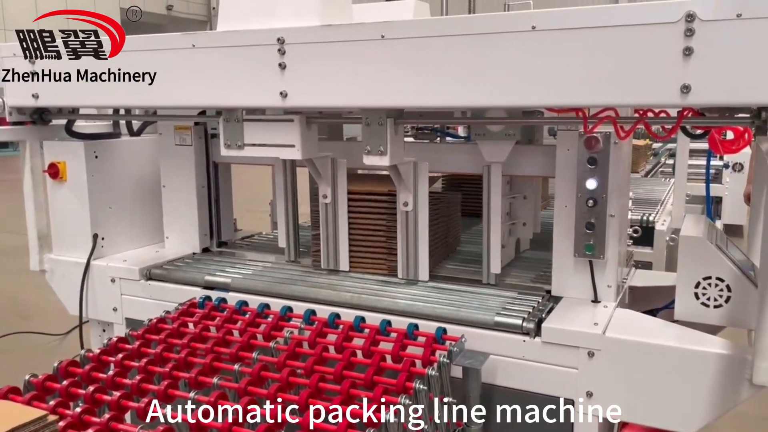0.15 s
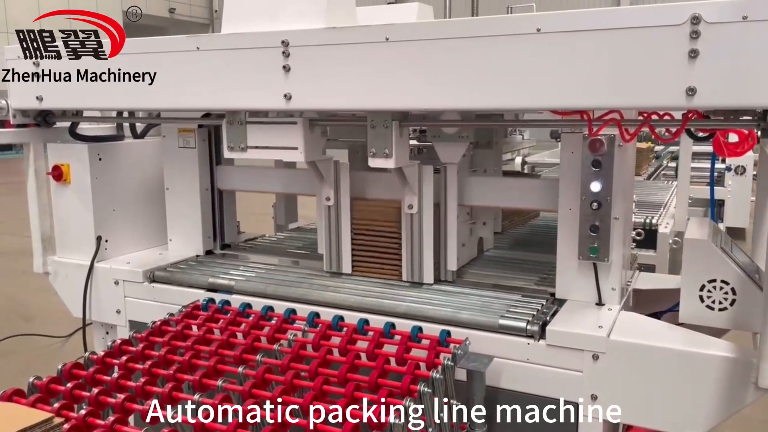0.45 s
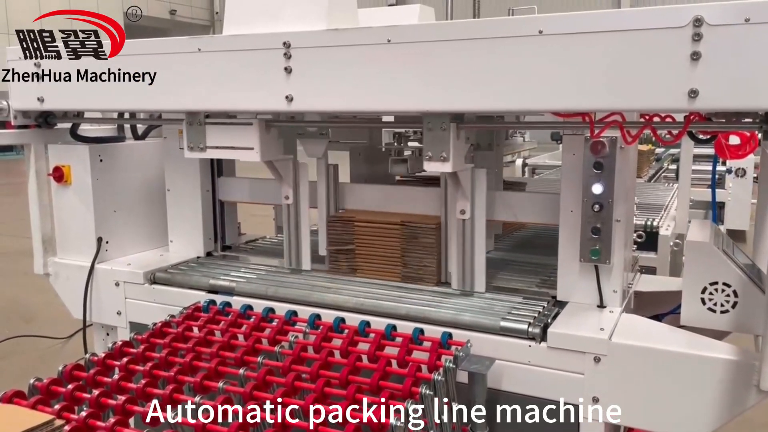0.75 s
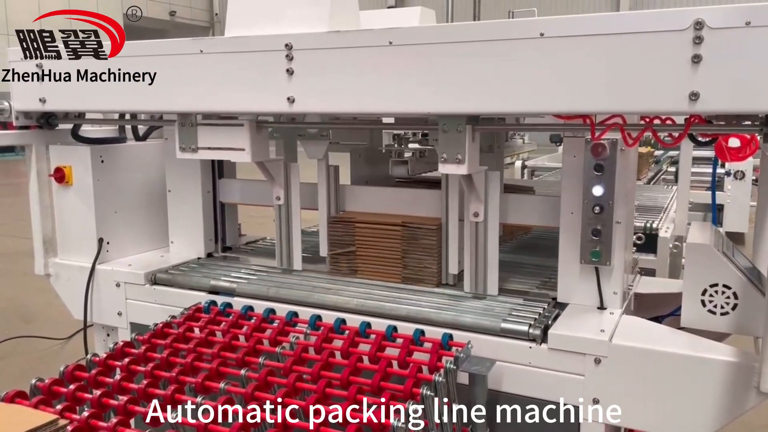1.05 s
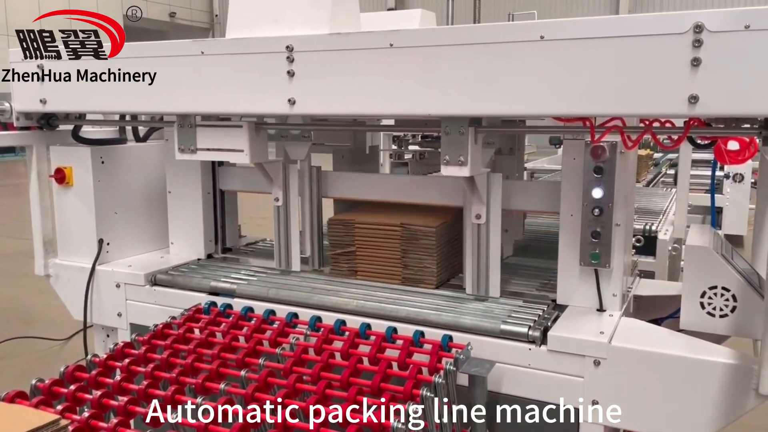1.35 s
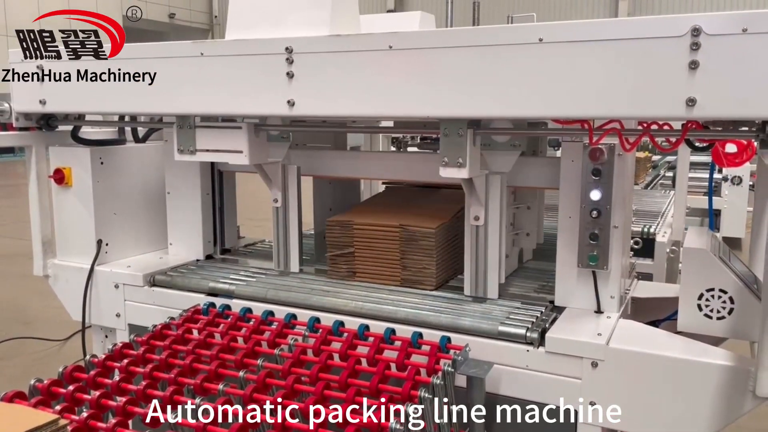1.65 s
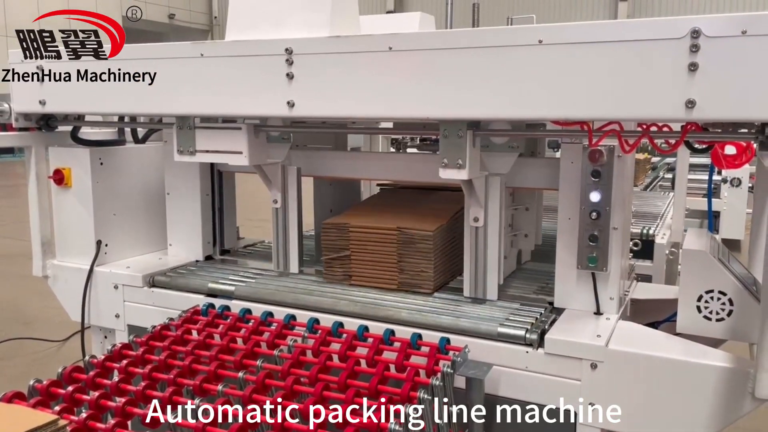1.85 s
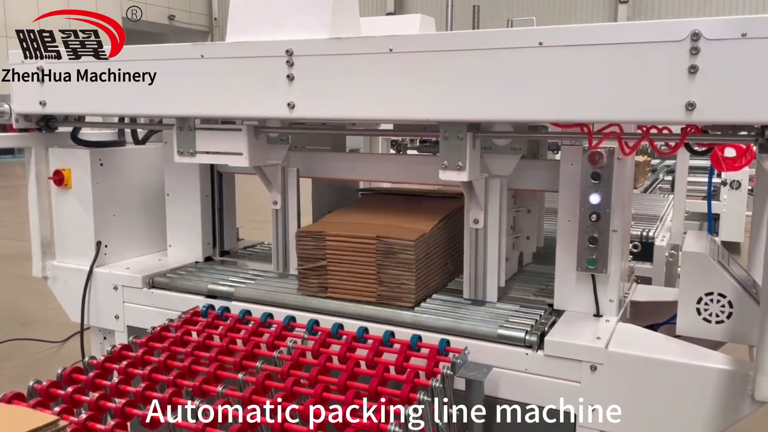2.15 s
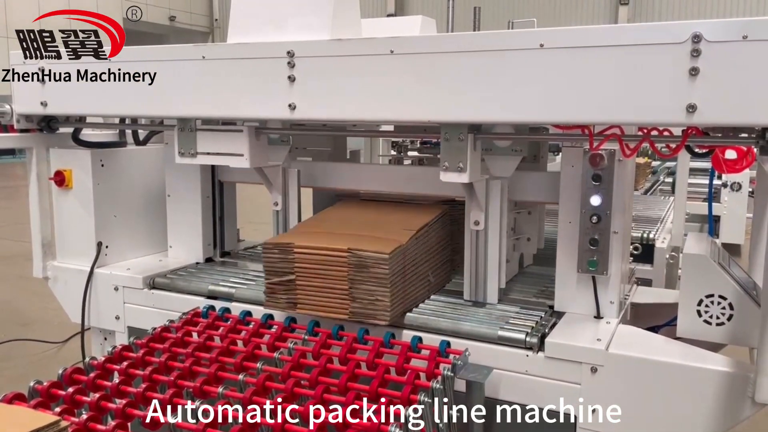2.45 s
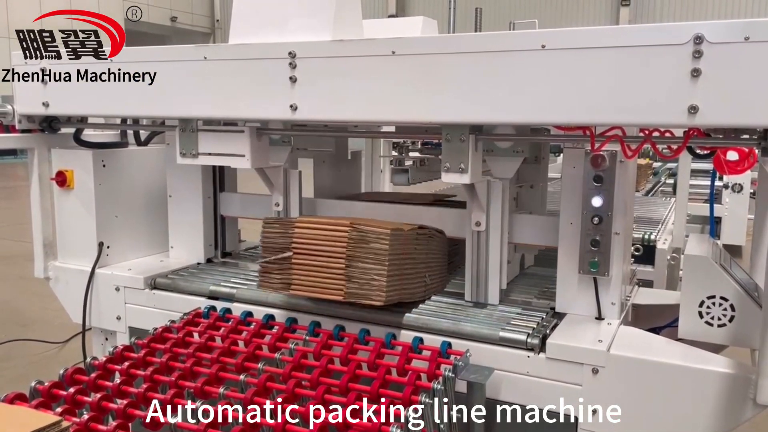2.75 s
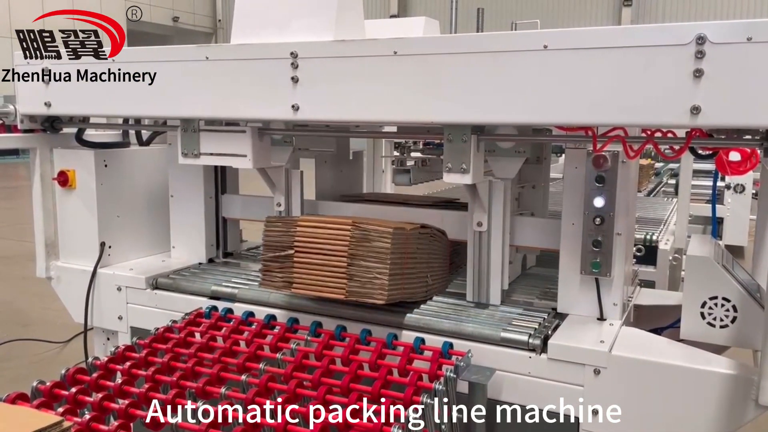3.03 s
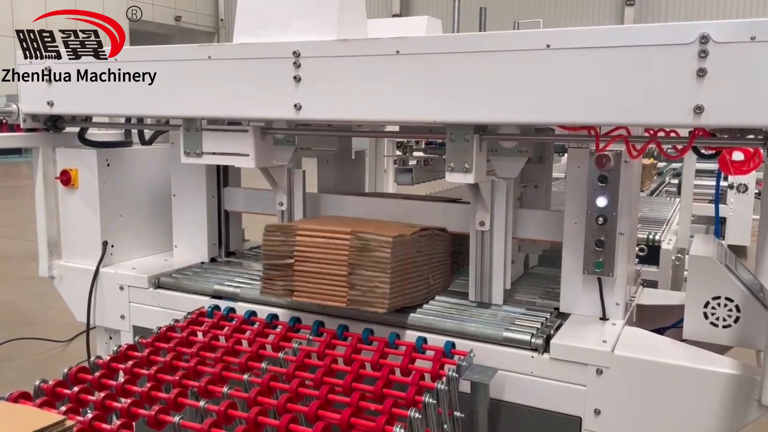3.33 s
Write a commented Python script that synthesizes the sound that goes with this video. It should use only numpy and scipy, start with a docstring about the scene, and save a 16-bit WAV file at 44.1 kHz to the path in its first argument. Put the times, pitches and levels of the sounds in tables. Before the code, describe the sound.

A packing machine handles a carton stack: rattle and air hiss, then irregular steel clacks, rising air-cylinder whistles, a low motor hum and late dull knocks, in a factory hall, heard fairly close on a stereo phone.

```python
"""A low rumble, a frame rattle and air hiss are heard first, over the smooth noise of a factory hall.
This is a packing line: steel arms soon clack against their stops, made from noise bursts and ringing modes.
Air cylinders whistle upward as they stroke: rising tones made breathy by slow noise.
A motor hum of two sine waves joins in, and late dull knocks are short low tones with a rustle."""
import sys
import numpy as np
from scipy import signal
from scipy.fft import rfft, irfft, next_fast_len
from scipy.io import wavfile
from scipy.ndimage import uniform_filter1d

SR = 44100
rng = np.random.default_rng(int(sys.argv[2]) if len(sys.argv) > 2 else 0)


def materialize(psi):
    """Save the field psi as 16-bit PCM at rate SR to the path in sys.argv[1].

    A 1-D psi becomes a single channel; in a 2-D psi each row is a channel.
    """
    bounded = np.clip(np.atleast_2d(psi).T, -1, 1)
    quanta = np.round(bounded * 32767).astype(np.int16)
    wavfile.write(sys.argv[1], SR, quanta)


def attenuation_scalar(level_db):
    """Turn a level in dB into a linear amplitude multiplier (20 dB per decade)."""
    decades = np.asarray(level_db, float) / 20
    return 10 ** decades


N = 153909
T = np.arange(N) / SR  # time of each sample [s]
SIZE = next_fast_len(N + SR // 2)  # spectrum size with room for the echo tail
HZ = np.arange(SIZE // 2 + 1) * SR / SIZE + 1e-3  # kept above 0 so that its logarithm exists

# moving line: (time [s], frame rattle level [dB], rasp level [dB], base air hiss level [dB],
# base top hiss level [dB])
LINE_LEVELS = [(0, -35.5, -57, -37, -55), (.39, -37, -39, -35.5, -48), (.46, -18, -24.5, -33, -44),
               (.62, -28.5, -34, -36, -54), (.8, -21.5, -26.5, -32.5, -43), (.93, -31, -36.5, -46, -53.5),
               (1.03, -25, -27, -31.5, -57), (1.22, -27.5, -33.5, -34.5, -55), (1.5, -31, -33.5, -35, -50),
               (1.72, -28.5, -34, -39.5, -59), (1.88, -47, -37, -37.5, -48.5),
               (1.95, -23.5, -31, -36.5, -45), (2.045, -32.5, -38, -30, -41.5),
               (2.13, -25.5, -32.5, -33.5, -35), (2.28, -38.5, -47.5, -43.5, -57),
               (2.6, -32, -35, -35, -44.5), (3.0, -43.5, -40.5, -39, -53.5), (3.49, -37.5, -38, -49, -49.5)]
# resonances of the frame: (frequency [Hz])
FRAME_MODES = [189.5, 239.8, 292, 335.7, 372.6, 421, 525]
# deep rumble: (time [s], base level [dB])
RUMBLE_LEVELS = [(0, -35.5), (1.25, -30), (1.8, -40), (3.49, -41.5)]
# modes of the steel arms: (frequency [Hz])
STEEL_MODES = [857, 1142, 1375, 1775, 2147, 2490, 2730, 3082, 3793, 4227, 4695, 5262]
# colour of the hall noise: (frequency [Hz], relative level [dB])
HALL_COLOUR = [(60, -2.5), (1000, -14), (12000, -40)]
# arms hitting steel stops: (time [s], peak level of the main sound [dB], favoured pitch [Hz],
# treble peak relative to the main sound [dB])
CLACK_HITS = [(0.115, -17.5, 1775, -35), (0.3618, -19, 3470, 2.5), (0.4286, -15, 1710, -25),
              (.451, -9.5, 1190, -13.5), (.478, -17.5, 1200, -25), (0.6479, -13, 1640, -22),
              (0.6967, -16.5, 4570, -14), (0.8202, -8, 4750, -8), (0.8285, -4, 4000, -1),
              (1.2865, -20, 4000, -8), (1.456, -13.5, 3130, -19), (1.547, -9.5, 1900, 1.5),
              (1.581, -10.5, 2500, -7), (1.714, -22, 1500, -27), (2.157, -13, 4700, 7),
              (2.4324, -15, 4340, -29), (2.635, -17, 4230, -8), (2.7795, -13.5, 4530, -15),
              (2.895, -9, 4640, -13), (2.92, -15, 2560, 2), (3.0667, -23, 2510, -30)]
# air strokes: (start [s], length [s], pitch approached at the end [Hz], base whistle level [dB])
AIR_STROKES = [(0.541, 0.39, 4130, -41.5), (1.758, 0.29, 3925, -43), (2.618, 0.36, 3796, -40.5)]
# whistle tones: (multiple of the pitch [1], relative level [dB], level change once risen [dB per s])
WHISTLE_TONES = [(1, 3, -32), (2, -1, -3), (3, -10, 3)]
# motor hum: (time [s], base level [dB])
HUM_LEVELS = [(.86, -25.5), (1.0, -36), (1.03, -24.5), (1.2, -20.5), (1.5, -43), (1.8, -36.5), (2.1, -42)]
# hum tones: (multiple of the hum pitch [1], relative level [dB])
HUM_TONES = [(1, 2), (4, -13.5)]
# dull knocks of carton and frame: (time [s], level [dB], pitch [Hz])
KNOCKS = [(2.503, -15.5, 532), (3.073, -18.5, 462), (3.275, -24, 189)]
# two microphone ports: (frequency [Hz], phase lead of left over right [rad], echo level [dB])
PORT_RESPONSE = [(60, 0, -7), (130, 0, -19), (500, 0, -7), (5000, .3, -3), (7900, -2.85, -20),
                 (10200, -3.25, -20), (11800, -5.9, -13)]


def unit(x):
    """Scale to rms 1."""
    return x / np.sqrt(np.mean(x ** 2))


def curve(table, column):
    """Join the points of a table column with straight lines over time."""
    points = np.array(table)
    return np.interp(T, points[:, 0], points[:, column])


def log_curve(table, column, left=None):
    """Join the points of a table column over the logarithm of frequency."""
    points = np.array(table)
    return np.interp(np.log(HZ), np.log(points[:, 0]), points[:, column], left=left)


def band(x, low_hz, high_hz):
    """Keep the frequencies between two limits."""
    edges = [low_hz, min(high_hz, 0.45 * SR)]
    return signal.sosfilt(signal.butter(2, edges, "band", fs=SR, output="sos"), x)


def walk(rate):
    """A smooth random curve with about `rate` new values per second and a spread near 1."""
    hold = int(SR / rate)
    steps = np.repeat(rng.standard_normal(N // hold + 1), hold)
    return 1.3 * uniform_filter1d(uniform_filter1d(steps, hold), hold)[:N]


def decay(t60, t):
    """An exponential fade that loses 60 dB in t60 seconds."""
    return np.exp(-np.log(1000) * t / t60)


def ring(hz, t60, t):
    """One mode of a struck body: a sine wave that dies away."""
    return np.sin(2 * np.pi * hz * t) * decay(t60, t)


def add(out, at, x):
    """Mix a short sound in at a time in seconds."""
    start = int(at * SR)
    out[start:start + len(x)] += x[:N - start]


def hiss(low_hz, high_hz, db):
    """Noise in one band whose level flickers at random around db."""
    noise = unit(band(rng.standard_normal(N), low_hz, high_hz))
    return attenuation_scalar(db + 3.72 * walk(15)) * noise


def whirr(modes):
    """Loose parts shake the arms: each mode flares up and dies on its own."""
    total = np.zeros(N)
    for hz in modes:
        shaken = unit(band(rng.standard_normal(N), hz * 0.97, hz / 0.97))
        total += attenuation_scalar(4 * walk(18)) * shaken
    return unit(total)


def frame():
    """Rollers tap the frame's resonances at random and rasp on the guides; a deep rumble lies under them."""
    taps_per_s, spread_db, width = 1200, 1.5, 0.15  # width is a share of each resonance's frequency
    happens = rng.random(N) < taps_per_s / SR
    taps = rng.standard_normal(N) * happens * attenuation_scalar(spread_db * rng.exponential(size=N))
    rattle = np.zeros(N)
    for k, hz in enumerate(FRAME_MODES):
        mode = unit(band(taps, hz * (1 - width / 2), hz * (1 + width / 2)))
        rattle += (-1) ** k * attenuation_scalar(3.1 * walk(12)) * mode  # neighbours swing in opposite directions
    rasp = unit(band(taps, 633, 1370)) + hiss(560, 3270, -2.5) + 0.67 * whirr(STEEL_MODES[:5])
    rumble = hiss(25, 149, curve(RUMBLE_LEVELS, 1))
    rattle = unit(rattle) * attenuation_scalar(curve(LINE_LEVELS, 1))
    rasp = unit(rasp) * attenuation_scalar(curve(LINE_LEVELS, 2))
    return rattle + rasp + rumble


def air_hiss():
    """Air rushes as flickering bands of noise, mixed with the whirr of the higher steel modes."""
    middle = hiss(2420, 4460, -7.5) + hiss(7950, 9740, -5) + 0.54 * whirr(STEEL_MODES[5:])
    top = hiss(7000, 10500, -3) + hiss(10800, 13500, -1)
    return middle * attenuation_scalar(curve(LINE_LEVELS, 3)) + top * attenuation_scalar(curve(LINE_LEVELS, 4))


def hall():
    """Distant machines merge into a smooth noise whose level drifts slowly."""
    colour = attenuation_scalar(log_curve(HALL_COLOUR, 1, left=-40))
    noise = irfft(rfft(rng.standard_normal(SIZE)) * colour)[:N]
    return unit(noise) * attenuation_scalar(-37 + 2.57 * walk(2.736))


def clacks():
    """Each stop chatters for a moment: a crack of noise that rings the modes nearest its own pitch most."""
    chatter_t60_s, tail_s = 0.055, 0.032
    ring_cycles = 110  # cycles in which a mode loses 60 dB
    scatter_db, slope_db = 4, -9.8  # random spread of the modes; loss per octave from the pitch
    out, t, modes = np.zeros(N), T[:SR // 4], np.array(STEEL_MODES)
    shape = np.minimum(t / 0.002, 1) * (decay(chatter_t60_s, t) + 0.3 * np.exp(-t / tail_s))
    for at, db, pitch, top_db in CLACK_HITS:
        push = rng.standard_normal(len(t)) * shape
        scatter = scatter_db * rng.standard_normal(len(modes))
        sizes = attenuation_scalar(scatter + slope_db * np.abs(np.log2(modes / pitch)))
        detuned = modes * attenuation_scalar(0.13 * rng.standard_normal(len(modes)))
        body = sum(size * ring(hz, ring_cycles / hz, t) for size, hz in zip(sizes, detuned))
        ringing = unit(signal.fftconvolve(push, body)[:len(t)])
        crack = unit(band(push, pitch / 4, pitch * 1.71))
        main = ringing + crack
        top = band(push * shape, 7000, 14000)  # shaped twice, so it dies sooner
        main = main / np.abs(main).max()
        top = top / np.abs(top).max()
        add(out, at - 0.001, attenuation_scalar(db) * (main + attenuation_scalar(top_db) * top))
    return out


def whistles():
    """Breathy whistles climb towards a top pitch during each air stroke, with two overtones."""
    start_hz, rise_s = 2150, 0.12
    width = 0.07  # spread of the breathy tone, as a share of its end pitch
    out = np.zeros(N)
    for at, length, end_hz, db in AIR_STROKES:
        t = T[:int(length * SR)]
        hz = end_hz - (end_hz - start_hz) * np.exp(-(t / rise_s) ** 2.1)
        fade = np.minimum(np.minimum(t / 0.08, (length - t) / 0.12), 1)
        for multiple, tone_db, change_db in WHISTLE_TONES:
            # two slow noises turn the pure tone into a narrow, breathy one
            slow_a, slow_b = (unit(band(rng.standard_normal(len(t)), 2.3, width * end_hz / 2))
                              for _ in range(2))
            phase = 2 * np.pi * multiple * np.cumsum(hz) / SR
            breathy = slow_a * np.sin(phase) + slow_b * np.cos(phase)
            level = db + tone_db + change_db * np.maximum(t - rise_s, 0) + 2 * walk(32)[:len(t)]
            add(out, at, attenuation_scalar(level) * fade * breathy)
    return out


def motor():
    """While the drive pulls, it hums: a slightly wavering low tone with a weak overtone."""
    hum_hz, fade_s = 199.5, 0.038
    phase = 2 * np.pi * np.cumsum(hum_hz * (1 + 0.0035 * walk(14.5))) / SR
    start, end = HUM_LEVELS[0][0], HUM_LEVELS[-1][0]
    on = np.clip(np.minimum(T - start, end - T) / fade_s, 0, 1)
    tones = sum(attenuation_scalar(db) * np.sin(multiple * phase) for multiple, db in HUM_TONES)
    return on * attenuation_scalar(curve(HUM_LEVELS, 1)) * tones


def thuds():
    """Soft pushes ring a low mode, and the carton rustles along with it."""
    out, t = np.zeros(N), T[:SR // 3]
    for at, db, pitch in KNOCKS:
        noise = unit(band(rng.standard_normal(len(t)), pitch / 2, pitch * 5))
        rustle = 0.3 * noise * np.exp(-t / 0.05)
        tone = ring(pitch, 0.05, t)  # loses 60 dB in 0.05 s, much faster than the rustle
        add(out, at, attenuation_scalar(db) * np.minimum(t / 0.0021, 1) * (tone + rustle))
    return out


def scene():
    """Direct sound reaches the two ports with a phase lag; echoes arrive from the sides."""
    mix = frame() + air_hiss() + hall() + clacks() + whistles() + motor() + thuds()
    direct = rfft(mix, SIZE)
    t = T[:SR // 2]
    tail = rng.standard_normal(len(t)) * decay(0.16, t)
    echo = direct * rfft(tail / np.sqrt(np.sum(tail ** 2)), SIZE)
    lead = log_curve(PORT_RESPONSE, 1)
    echo = attenuation_scalar(log_curve(PORT_RESPONSE, 2)) * echo
    channels = []
    for side in (1, -1):  # left, right: the echo has opposite signs in the two
        heard = (direct + side * echo) * np.exp(0.5j * side * lead)
        channels.append(irfft(heard, SIZE)[:N])
    return np.array(channels)


def low_pass(x):
    """Removes everything above the highest recorded frequency."""
    return signal.sosfilt(signal.butter(12, 16670, fs=SR, output="sos"), x)


def record(dry):
    """The phone cuts the deepest bass and the highest treble."""
    limits = signal.butter(4, [45, 15200], "band", fs=SR, output="sos")
    mix = signal.sosfilt(limits, dry)
    return low_pass(mix)


dry = scene()
out = record(dry)
materialize(out)
```